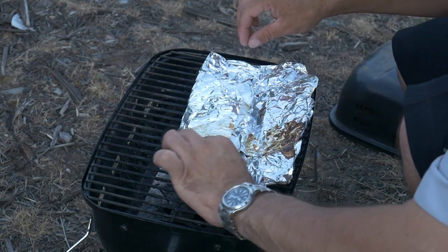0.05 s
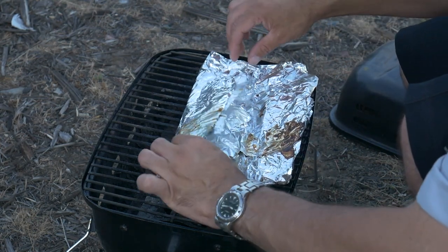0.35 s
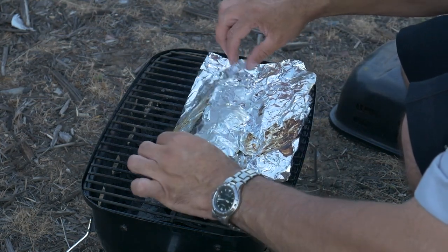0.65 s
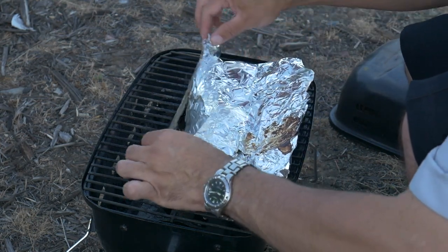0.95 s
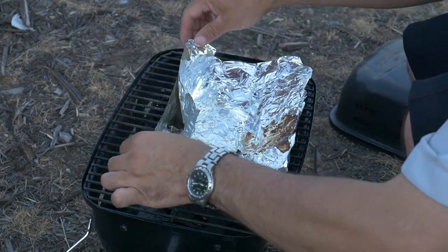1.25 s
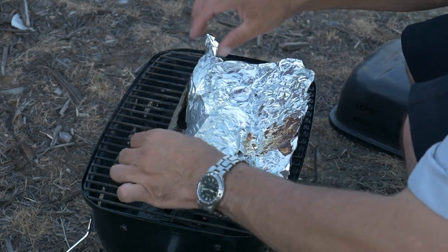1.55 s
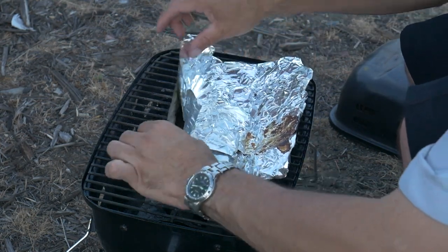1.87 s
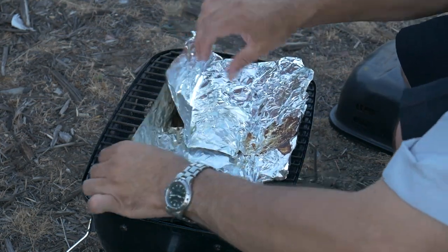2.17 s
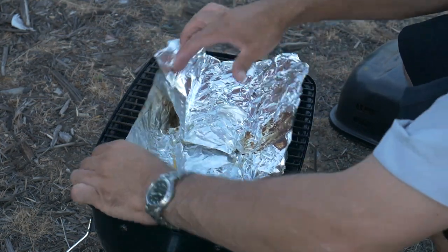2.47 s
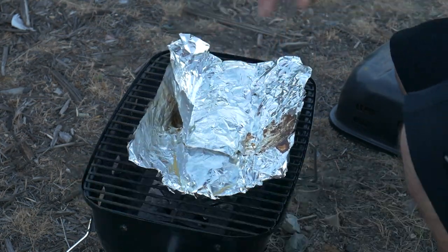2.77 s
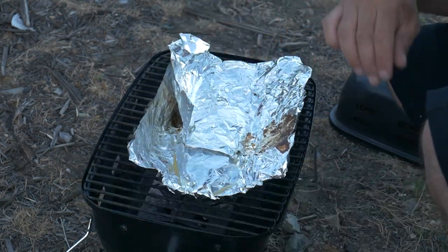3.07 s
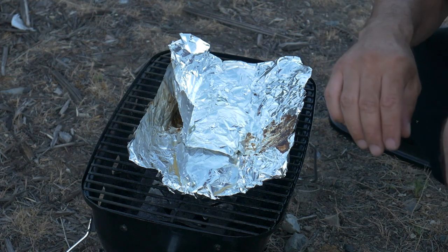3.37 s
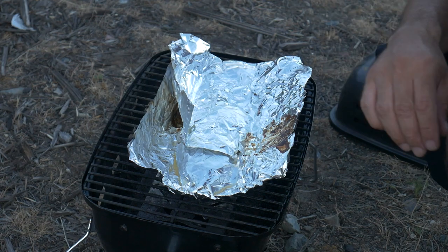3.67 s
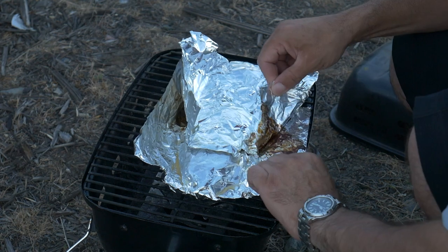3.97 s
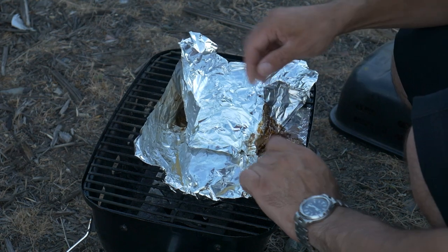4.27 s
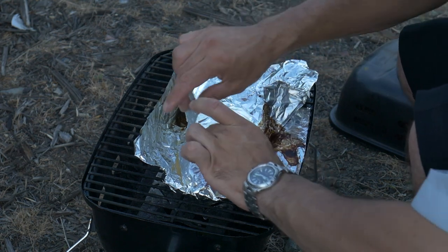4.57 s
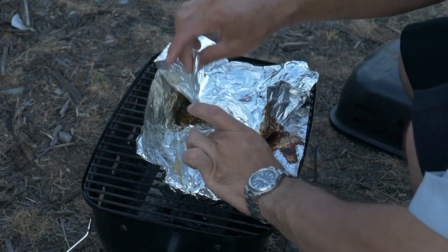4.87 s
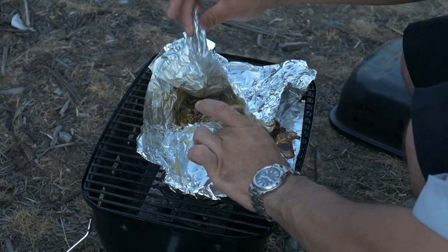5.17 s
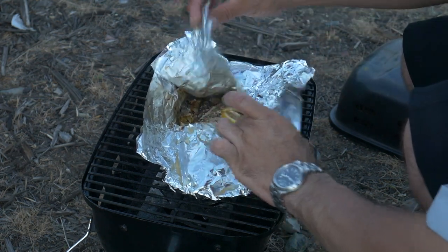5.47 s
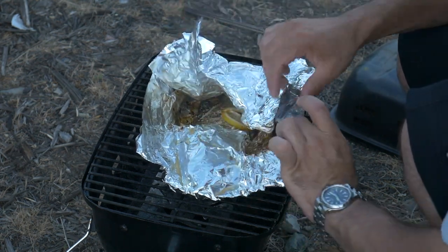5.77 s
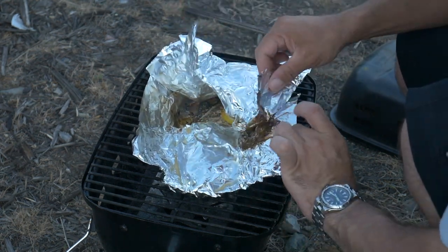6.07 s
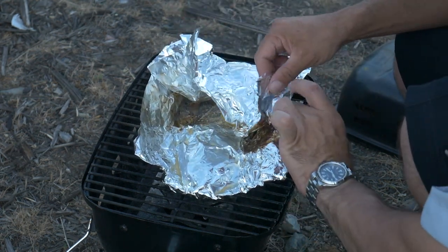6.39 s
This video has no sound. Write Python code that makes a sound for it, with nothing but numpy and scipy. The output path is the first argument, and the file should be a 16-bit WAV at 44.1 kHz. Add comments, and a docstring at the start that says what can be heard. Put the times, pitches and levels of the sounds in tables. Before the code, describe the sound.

Close to the microphone, hands peel open an aluminium foil packet on a small grill. The foil rustles and crackles in irregular bursts with sharp single snaps, and a sleeve swishes softly. After a lull of about a second the crinkling returns, while the heavy packet scrapes and bumps dully on the grate, ending on a strong crunch. Faint outdoor air, a low rumble and distant birds lie behind.

```python
"""Foil packet on a grill

Outdoors, close to the microphone, two hands peel open an aluminium foil packet of food on a small grill.
Facets of the foil buckle: big ones snap singly, middling ones crackle, swarms of small ones rustle.
The packet scrapes and bumps softly on the grate, and a sleeve swishes as the arms move.
Far behind lie air noise, a rumble, a low hum and faint birds."""
import sys
import numpy as np
from scipy import signal
from scipy.fft import rfft, irfft
from scipy.io import wavfile

SR = 44100
rng = np.random.default_rng(int(sys.argv[2]) if len(sys.argv) > 2 else 0)


def output_pcm(signal):
    """Save a mono or channel-first signal as 16-bit PCM at the path in sys.argv[1].

    Samples are clipped to [-1, 1] before scaling.
    """
    pcm = np.clip(np.atleast_2d(signal).T, -1, 1) * 32767
    wavfile.write(sys.argv[1], SR, np.round(pcm).astype(np.int16))


N = 287973
TIME = np.arange(N) / SR
GRAIN = 1024  # samples in one facet's sound
SIDE = np.array([[1], [-1]])  # adds to the left channel, subtracts from the right

# spectrum the crumpled sheet radiates: f/Hz, relative level/dB
FOIL_SPECTRUM = [(100, -23.5), (450, -13.5), (650, -5), (900, -4), (1400, 0.5), (2200, 3.5), (3000, 0.5),
                 (4200, 4.5), (6400, -1.5), (8800, 6), (10500, -9), (12000, -4), (14500, -6), (16000, -15)]
# each pull or fold of the sheet: start t/s, length/s, effort at its middle/dB,
# swell from start to end/dB, relative crackle level/dB
FOIL_PULLS = [(0, 0.28, -55, 3.5, -60), (0.482, 0.038, -38.5, 1.5, -46.5), (0.653, 0.061, -43.5, -5, -47.5),
              (0.724, 0.34, -51, -1, -45), (1.022, 0.043, -33.5, 8, -36), (1.104, 0.17, -52, 0, -49.5),
              (1.209, 0.044, -40, 8, -41), (1.358, 0.059, -43.5, 6.5, -42), (1.484, 0.043, -49, 0, -48),
              (1.685, 0.013, -48.5, 5, -48.5), (1.755, 0.12, -54, -6, -47), (1.869, 0.343, -51, 3, -43),
              (2.234, 0.21, -36.5, 7.5, -35), (2.509, 0.069, -36.5, 9, -40.5),
              (3.916, .11, -33, -3.5, -35.5), (4.027, 0.093, -48, -15, -43.5),
              (4.147, 0.078, -44.5, 21, -41), (4.706, .1, -48, -10, -40), (4.856, 0.099, -44, 18, -39),
              (5.003, 0.084, -39.5, -5, -39), (5.124, 0.062, -42.5, -3, -35.5),
              (5.252, 0.032, -41, 6.5, -39.5), (5.307, .11, -51.5, -1, -45.5),
              (5.523, 0.027, -33.5, -1.5, -40), (5.579, 0.024, -42, 2, -42.5), (5.876, 0.026, -44, -4, -43),
              (5.945, .05, -45.5, 5, -43.5), (6.02, .1, -50, 6, -40.5), (6.344, 0.14, -32.5, 11, -38),
              (6.495, .03, -40.5, 3, -40)]


def undb(db):
    """Decibels to gain."""
    return 10 ** (np.asarray(db) / 20)


def unit(x):
    """Each row scaled to rms 1."""
    return x / np.sqrt(np.mean(x ** 2, axis=-1, keepdims=True))


def log_hz(size):
    """Octave position of each frequency bin."""
    return np.log2(np.maximum(np.fft.rfftfreq(size, 1 / SR), 10))


def spectrum_db(points, size):
    """Points (f/Hz, level/dB) joined on an octave axis."""
    hz, db = np.transpose(points)
    return np.interp(log_hz(size), np.log2(hz), db)


def fader(points):
    """Gain over time through points (t/s, level/dB)."""
    return undb(np.interp(TIME, *np.transpose(points)))


def colour(x, db):
    """Minimum-phase filter with the given level per bin, row by row."""
    size = x.shape[-1]
    cepstrum = irfft(db * np.log(10) / 20, size)
    cepstrum[..., 1:size // 2] *= 2
    cepstrum[..., size // 2 + 1:] = 0
    return irfft(rfft(x) * np.exp(rfft(cepstrum)), size)


def band_noise(lo_hz, hi_hz, shape=N):
    """Band-passed white noise."""
    sos = signal.butter(2, [lo_hz, hi_hz], "band", fs=SR, output="sos")
    return signal.sosfilt(sos, rng.standard_normal(shape))


def walk(rate_hz):
    """Smooth random drift with a spread near 1."""
    knots = np.arange(0, TIME[-1] + 1, 1 / rate_hz)
    return np.interp(TIME, knots, rng.standard_normal(len(knots)))


def place(times, sounds):
    """Lay short sounds on the time line."""
    out = np.zeros(N + sounds.shape[1])
    for start, sound in zip(np.clip(times * SR, 0, N).astype(int), sounds):
        out[start:start + len(sound)] += sound
    return out[:N]


def air(level_db=-55.5, side_db=-20):
    """Distant outdoor noise, nearly centred, its level drifting slightly."""
    # rumble and hiss of the open air: f/Hz, relative level/dB
    air_spectrum = [(30, 2), (90, -13), (140, -6.5), (300, -9), (800, -10.5), (1200, -10), (3000, -16.5),
                    (8500, -24.5), (11000, -29.5)]
    white = rng.standard_normal((2, N))
    mid, side = unit(irfft(rfft(white) * undb(spectrum_db(air_spectrum, N)), N))
    return (mid + undb(side_db) * side * SIDE) * undb(level_db + walk(2.88))


def rumble():
    """A far-off low rumble swells and eases a little."""
    # course of the rumble: t/s, level/dB
    swell = [(1.5, -69), (3.7, -60), (4.8, -61), (6.2, -63.5)]
    return unit(band_noise(68.0, 101.4)) * fader(swell)


def hum(hz=103, level_db=-68.5):
    """A low background hum wavers in pitch and level."""
    tone = np.sin(2 * np.pi * np.cumsum(hz + walk(10)) / SR)
    return unit(tone * undb(2 * walk(2.14))) * undb(level_db)


def birds(hz=4810, swing_hz=205.6, level_db=-66.5):
    """The thin twitter of far birds wanders in pitch, blurred by its many paths through the trees."""
    blur = walk(700) * undb(3 * walk(12))
    twitter = np.sin(2 * np.pi * np.cumsum(hz + swing_hz * walk(35)) / SR)
    return unit(twitter * blur) * undb(level_db)


def handling(grip_s=0.0069, relax_s=0.011, rest_db=-64):
    """Effort on the sheet as a gain: the fingers take hold, the strain grows or eases, the foil rests."""
    effort = np.zeros(N)
    for start, length, db, swell_db, _ in FOIL_PULLS:
        progress = np.clip((TIME - start) / length, 0, 1)
        before = np.maximum(start - TIME, 0) / grip_s
        after = np.maximum(TIME - start - length, 0) / relax_s
        pull = undb(db + swell_db * (progress - .5)) * np.exp(-before - after)
        effort = np.maximum(effort, pull)
    return effort + undb(rest_db)


def buckle(tilt, ring_hz, t60, ring_db, patchy_db, step_db):
    """One row per facet: a sharp crack, a flutter dying in the creased sheet, and its own short ring."""
    t = np.arange(GRAIN) / SR
    chance = rng.standard_normal((len(tilt), GRAIN + 49))
    noise, lag, patches = chance[:, :GRAIN], chance[:, GRAIN], chance[:, GRAIN + 1:]
    decay = np.exp(-np.log(1000) * t / t60[:, None])
    ring = np.sin(2 * np.pi * ring_hz[:, None] * t) * decay
    crack = 1 + .8 * np.exp(-t / .0005)
    # each facet has its own shape, so its own peaks and dips
    bin_position = np.sqrt(np.linspace(0, 1, GRAIN // 2 + 1))
    ripple = np.array([np.interp(bin_position, np.linspace(0, 1, len(row)), row) for row in patches])
    octaves = np.maximum(log_hz(GRAIN), np.log2(500)) - np.log2(3500)
    db = spectrum_db(FOIL_SPECTRUM, GRAIN) + tilt[:, None] * octaves + patchy_db * ripple
    flip = colour(noise * decay * crack + undb(ring_db) * ring, db)
    # it gives way in two steps, a millisecond or so apart
    delayed = np.arange(GRAIN) - (SR * .0012 * 2 ** lag[:, None]).astype(int)
    second_step = (delayed >= 0) * np.take_along_axis(flip, np.maximum(delayed, 0), axis=1)
    return unit(flip + undb(step_db) * second_step)


def rustle(effort, count=1500, t60=0.016, brightening=0.21, slide_db=-6, slide_tilt=-3.0, gain_db=-1):
    """Small facets swarm, brighter with more effort, over the hiss of foil sliding on foil."""
    slot, pitch = rng.random((count, 2)).T
    times = (np.arange(count) + slot) * TIME[-1] / count
    size, shade = np.clip(rng.standard_normal((count, 2)).T, -2, 2)
    effort_db = 20 * np.log10(np.interp(times, TIME, effort))
    tilt = brightening * (effort_db + 32) + 2.5 * shade  # dB per octave
    facets = buckle(tilt, 1000 * 2 ** (3 * pitch), np.full(count, t60),
                    ring_db=-13, patchy_db=4.5, step_db=-3.5)
    swarm = unit(place(times, facets * undb(5 * size)[:, None]))
    slide_spectrum = undb(spectrum_db(FOIL_SPECTRUM, N) + slide_tilt * log_hz(N))
    hiss = irfft(rfft(rng.standard_normal(N)) * slide_spectrum, N)
    slide = unit(hiss * undb(3.5 * walk(250)))
    buckling = effort / (effort + undb(-57))  # a barely moved sheet mostly slides
    return (buckling * swarm + undb(slide_db) * slide) * effort * undb(gain_db)


def crackle(count=32, gap_s=0.016, t60=0.014, gain_db=-3, spread_db=4.0):
    """During a pull middling facets give way at chance moments, each with its own size and shade."""
    out = np.zeros(N)
    for start, length, _, _, db in FOIL_PULLS:
        slot, pitch = rng.random((count, 2)).T
        size, shade = np.clip(rng.standard_normal((count, 2)).T, -2, 2)
        after = (np.arange(count) + slot) * gap_s
        tilt = 1 + 3.5 * shade  # dB per octave
        facets = buckle(tilt, 1800 * 2 ** (2.3 * pitch), np.full(count, t60),
                        ring_db=-14, patchy_db=3.5, step_db=-5.5)
        gain = undb(db + gain_db + spread_db * size) * (after < length)
        out += place(start + after, facets * gain[:, None])
    return out


def drag(effort, judder_db=4):
    """A pull also drags the heavy packet, which scrapes unevenly on the grate."""
    # low scrape of the packet: t/s, level relative to the effort/dB
    scrape_levels = [(1.1, -21), (2.4, -17.5), (4, -16), (5.4, -24), (6.05, -5.5), (6.4, -15)]
    scrape = unit(band_noise(210, 680) * undb(judder_db * walk(60)))
    return scrape * effort * fader(scrape_levels)


def snaps(gain_db=-3.5, base_t60=0.027, doubling_db=26, shortening=0.029):
    """Large facets flip one at a time; the larger and duller, the longer they ring."""
    # the loudest facets snapping through: t/s, relative level/dB, tilt/(dB per octave), ring f/Hz
    large_facets = [(0.0251, -38.5, 4.5, 7990), (0.051, -46, 3, 8800), (0.069, -42, 5, 12900),
                    (0.097, -40.5, -0.5, 8000), (0.124, -40.5, -7, 3790), (0.2987, -44.5, -2.5, 3380),
                    (0.3468, -33, 0, 4580), (0.689, -38.5, 0, 2640), (0.733, -38.5, 3, 5070),
                    (0.746, -35.5, 8, 8200), (0.7657, -30, 8, 8000), (0.803, -30.5, 0.5, 8200),
                    (0.8434, -34, -1, 8160), (0.8772, -30, 1, 8400), (0.9301, -36, -2.5, 5440),
                    (0.9565, -34.5, 12, 13300), (1.0484, -27.5, 2, 12500), (1.136, -37.5, 1, 5450),
                    (1.187, -32, -1.5, 4700), (1.2127, -34.5, 7, 3640), (1.3397, -40.5, -1.5, 3705),
                    (1.555, -38, -1, 4420), (1.5894, -40.5, -3.5, 3480), (1.8395, -38, -1.5, 4580),
                    (1.8873, -39, -2, 9000), (1.9233, -28, -1, 3800), (1.9602, -34.5, 0, 3530),
                    (2.0209, -33, -2.5, 2470), (2.052, -36, 4, 7400), (2.186, -27.5, 0.5, 3604),
                    (2.2514, -32.5, 5, 8640), (2.3195, -29, 0, 3400), (2.3505, -30.5, -8, 725),
                    (2.431, -27, -5, 4000), (2.4928, -36, 3, 8100), (2.5822, -31.5, -1, 3960),
                    (2.6277, -45.5, -1, 4500), (3.0165, -45.5, -5, 2960), (3.0746, -46, -7.5, 1690),
                    (3.225, -48, -4.5, 7000), (3.2528, -36.5, 3, 8830), (3.7677, -43.5, -5, 1210),
                    (3.91, -33.5, -3.5, 7850), (3.9267, -27.5, -3.5, 3070), (3.9516, -28, 1.5, 2440),
                    (4.095, -42, 8, 13870), (4.155, -40, 0, 14000), (4.2261, -25, -1, 3250),
                    (4.7135, -35.5, 0.5, 4700), (4.79, -30.5, 1, 8100), (4.8964, -36.5, -2, 1810),
                    (4.923, -31.5, -3.5, 8570), (4.964, -26.5, -1.5, 4100), (5.017, -36, -3.5, 1810),
                    (5.0407, -29, -1, 2130), (5.104, -25, 0.5, 8150), (5.1522, -30, -2, 1700),
                    (5.1814, -31.5, -2, 1420), (5.206, -31, -4, 1350), (5.221, -34, -5.5, 2260),
                    (5.3875, -37, -3, 1475), (5.4626, -34, -2, 2220), (5.5783, -34.5, -4.5, 3260),
                    (5.9402, -33, 2.5, 8580), (6.018, -32.5, 0, 6660), (6.0414, -26, -0.5, 8200),
                    (6.096, -36, 1, 1950), (6.195, -42.5, -5, 2620), (6.27, -35, -3, 2310),
                    (6.3213, -34, 0.5, 4500), (6.4853, -25.5, -1, 1950), (6.4865, -24, -1.5, 1830)]
    times, db, tilt, ring_hz = np.transpose(large_facets)
    t60 = base_t60 * 2 ** ((db - db.mean()) / doubling_db - shortening * tilt)
    facets = buckle(tilt, ring_hz, t60, ring_db=-11, patchy_db=3, step_db=-6)
    return place(times, facets * undb(db + gain_db)[:, None])


def sleeve():
    """Cloth swishes softly near the microphone as the arms draw back."""
    # shirt cloth moving with the arms: t/s, level/dB
    cloth_levels = [(1.9, -68), (2.35, -47), (2.65, -58.5), (3.5, -60), (4.3, -65)]
    return unit(band_noise(560, 950)) * fader(cloth_levels)


def bumps(t60=0.044, rise_s=0.0054, thud_db=2, gain_db=-6):
    """The soft, heavy packet knocks dully on the grate, with a hollow note."""
    # the filled packet bumping under the fingers: t/s, relative level/dB, note f/Hz
    knocks = [(2.185, -40, 440), (2.348, -40, 350), (2.578, -43, 403), (3.764, -43, 250),
              (3.949, -32.5, 477), (4.067, -41, 175), (5.015, -37, 243), (5.875, -41.5, 245),
              (5.972, -45, 352), (6.036, -35, 456), (6.288, -42.5, 378), (6.477, -25, 340)]
    times, db, hz = np.transpose(knocks)
    t = np.arange(4 * GRAIN) / SR
    thud = unit(band_noise(126, 1000, (len(times), len(t))))
    note = np.sin(2 * np.pi * hz[:, None] * t)
    envelope = (1 - np.exp(-t / rise_s)) * np.exp(-np.log(1000) * t / t60)
    sounds = (note + undb(thud_db) * thud) * envelope / envelope.max()
    return place(times, sounds * undb(db + gain_db)[:, None])


def surroundings(close, mid_t60=0.042, side_t60=0.03, scatter_db=-22):
    """Grill, body and ground scatter a little sound back, differently to the two microphones."""
    # stereo width of near sounds: f/Hz, side minus mid level/dB
    width = [(400, -21), (1800, -24), (6000, -20), (13000, -17)]
    t = np.arange(8 * GRAIN) / SR
    decays = np.exp(-np.log(1000) * t / np.array([[mid_t60], [side_t60]]))
    tails = rng.standard_normal((2, len(t))) * decays
    mid_tail, side_tail = tails / np.linalg.norm(tails, axis=1, keepdims=True)
    mid = signal.fftconvolve(close, mid_tail)[:N]
    side = signal.fftconvolve(close, colour(side_tail, spectrum_db(width, len(t))))[:N]
    return close + undb(scatter_db) * mid + side * SIDE


def scene():
    """The foil packet close up, the open air far behind it."""
    effort = handling()
    close = snaps() + crackle() + rustle(effort) + drag(effort) + bumps() + sleeve()
    return surroundings(close) + air() + rumble() + hum() + birds()


def record(dry, hiss_db=-69, top_hz=15700):
    """Each microphone adds its own faint hiss; the camera cuts the top of the treble."""
    hiss = undb(hiss_db) * rng.standard_normal(dry.shape)
    lowpass = signal.ellip(10, .2, 70, top_hz, fs=SR, output="sos")
    return signal.sosfilt(lowpass, dry + hiss)


dry = scene()
out = record(dry)
output_pcm(out)
```